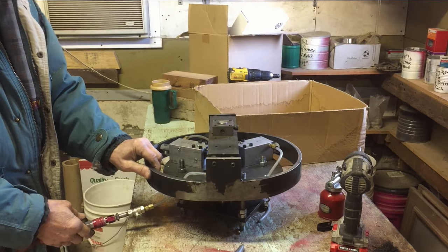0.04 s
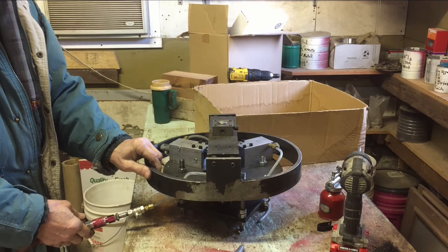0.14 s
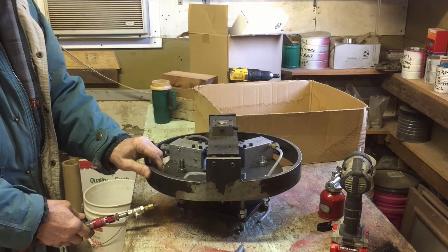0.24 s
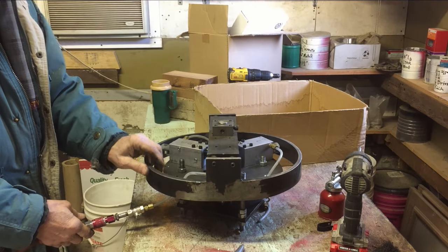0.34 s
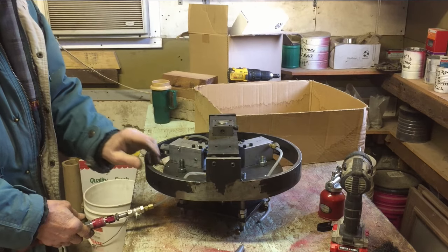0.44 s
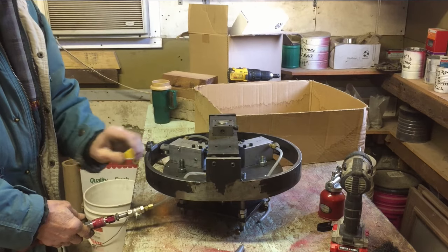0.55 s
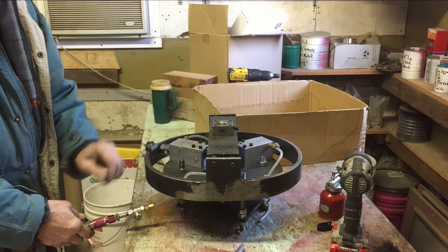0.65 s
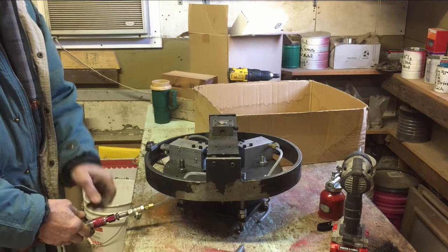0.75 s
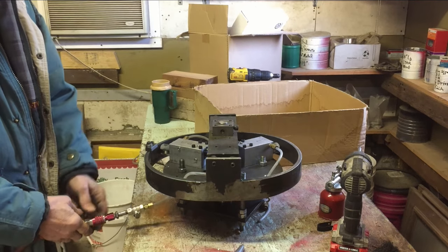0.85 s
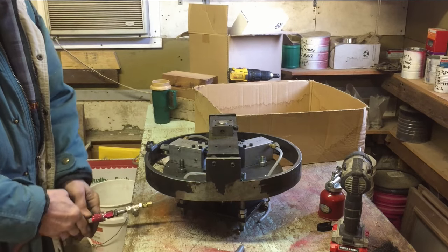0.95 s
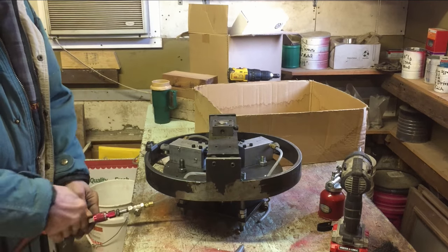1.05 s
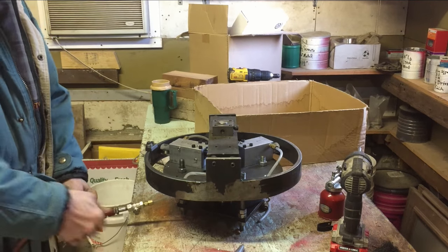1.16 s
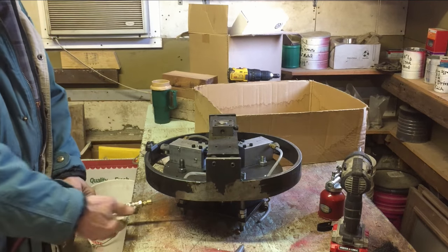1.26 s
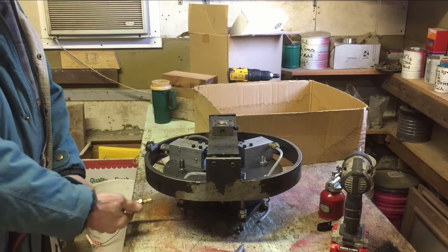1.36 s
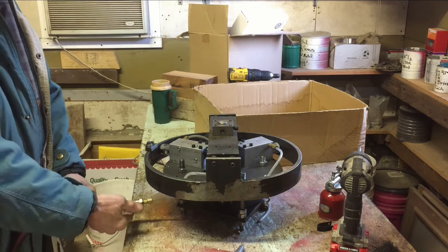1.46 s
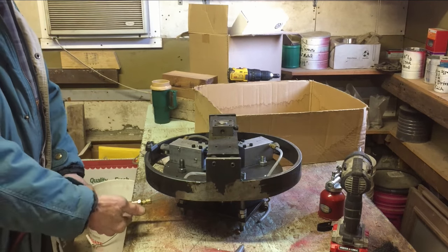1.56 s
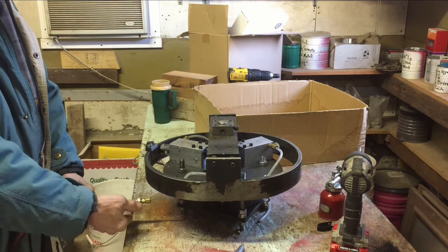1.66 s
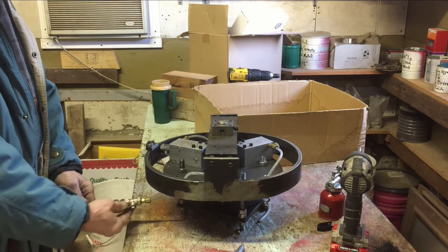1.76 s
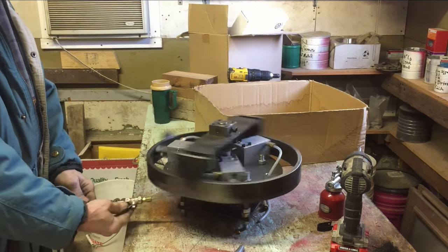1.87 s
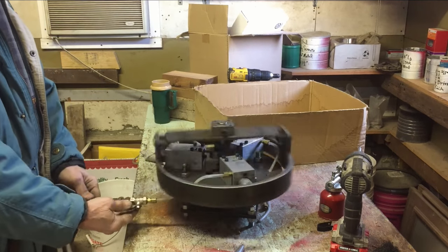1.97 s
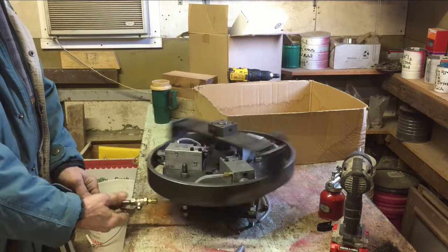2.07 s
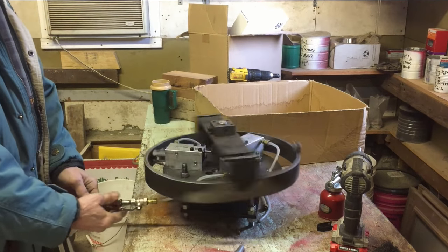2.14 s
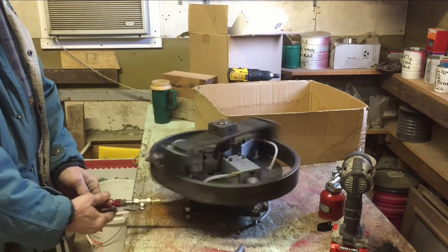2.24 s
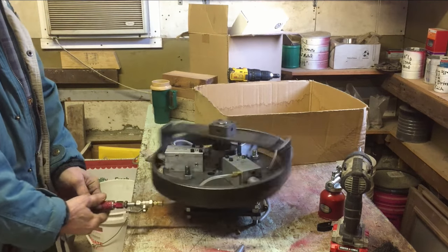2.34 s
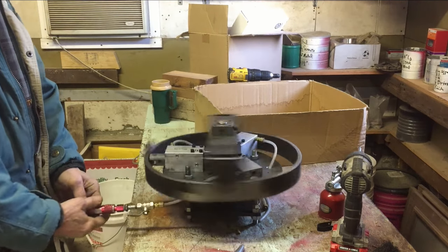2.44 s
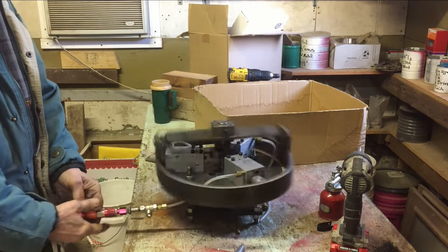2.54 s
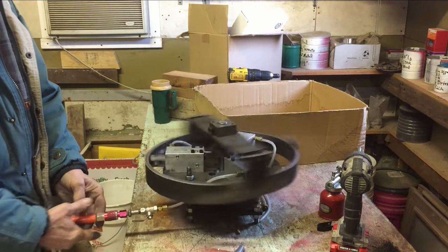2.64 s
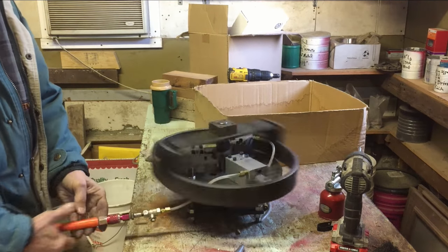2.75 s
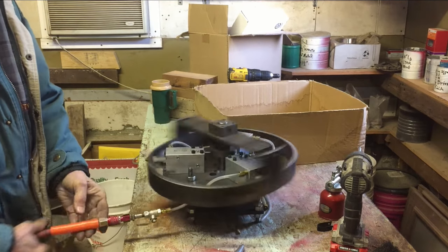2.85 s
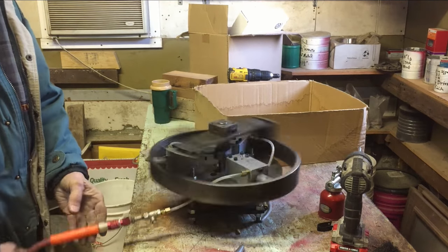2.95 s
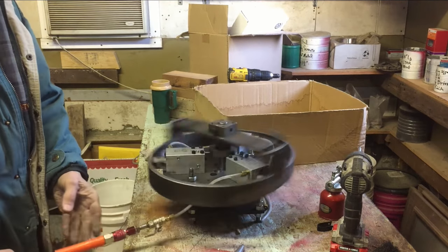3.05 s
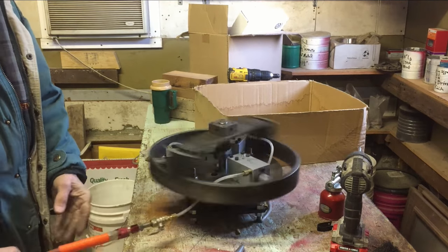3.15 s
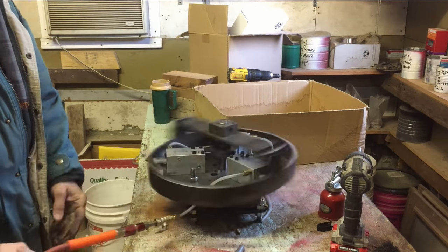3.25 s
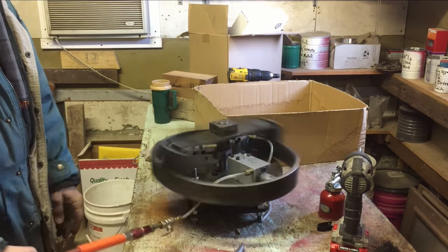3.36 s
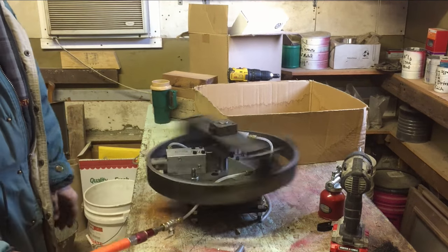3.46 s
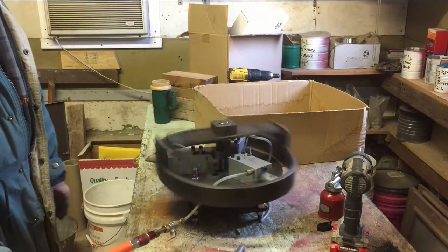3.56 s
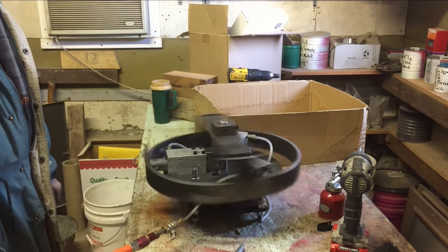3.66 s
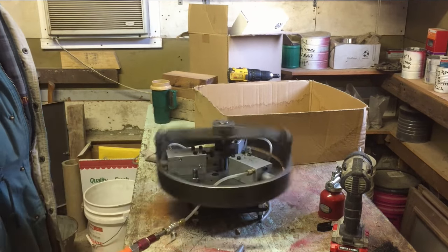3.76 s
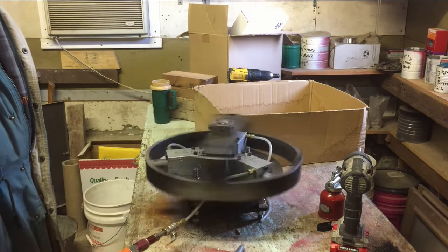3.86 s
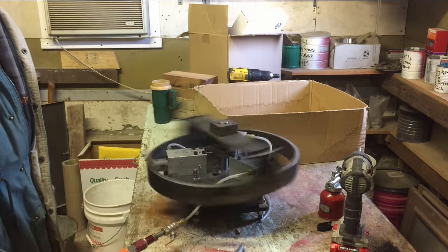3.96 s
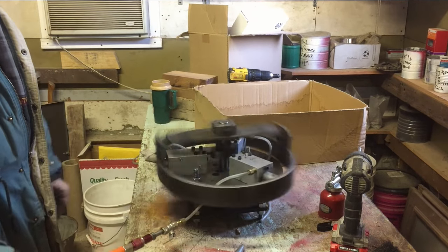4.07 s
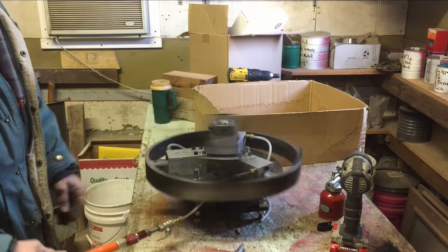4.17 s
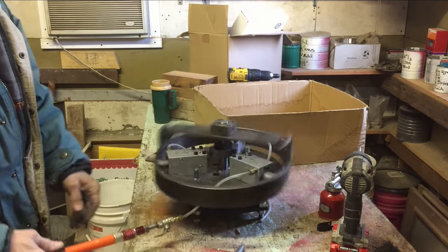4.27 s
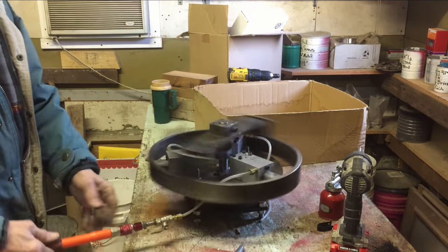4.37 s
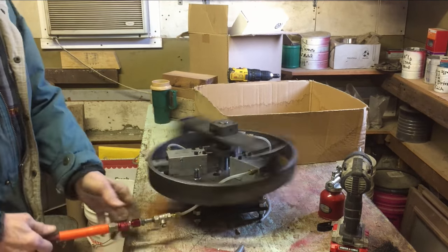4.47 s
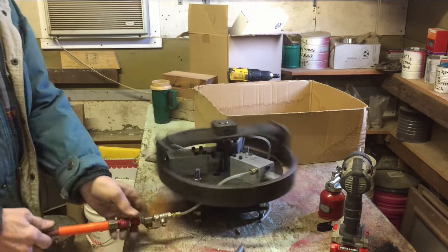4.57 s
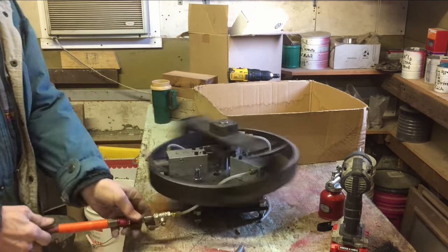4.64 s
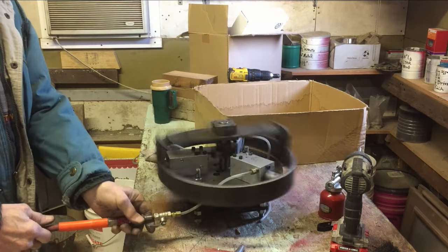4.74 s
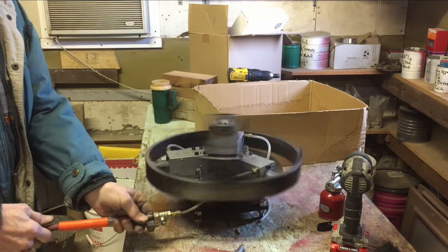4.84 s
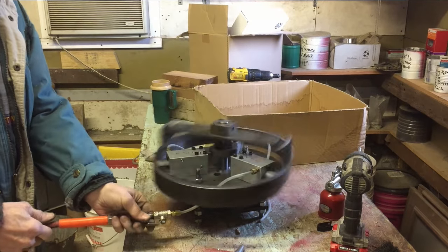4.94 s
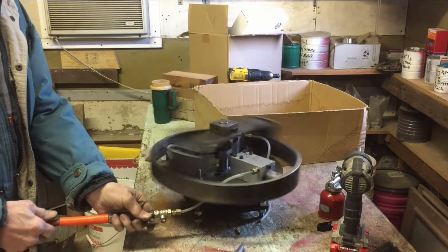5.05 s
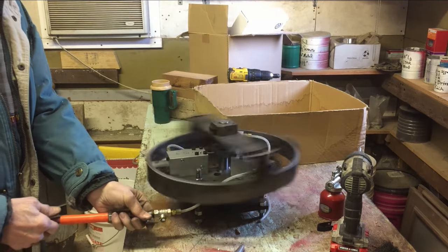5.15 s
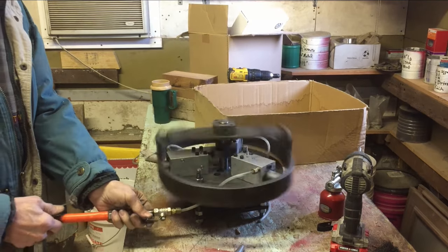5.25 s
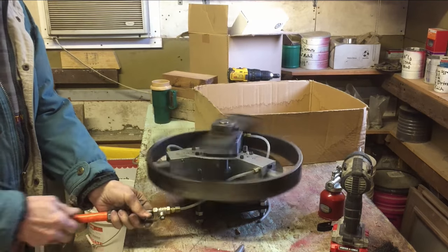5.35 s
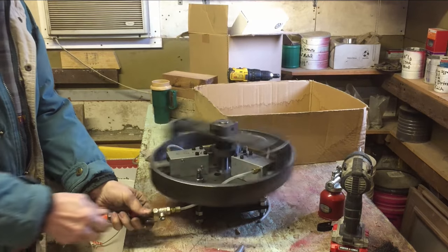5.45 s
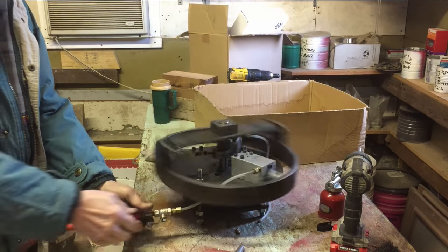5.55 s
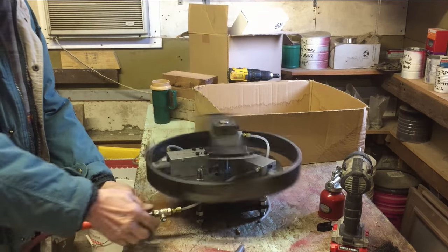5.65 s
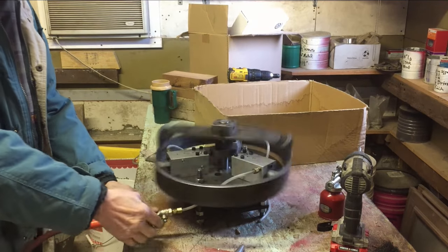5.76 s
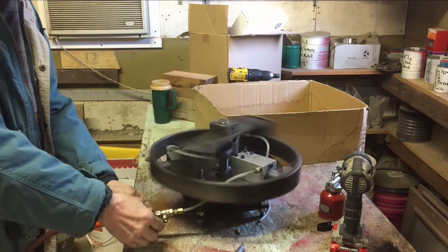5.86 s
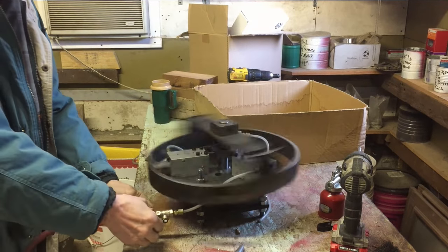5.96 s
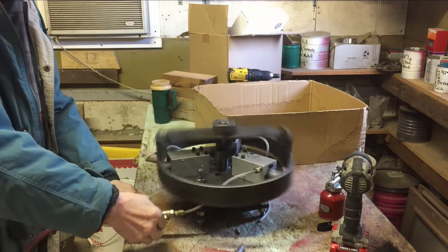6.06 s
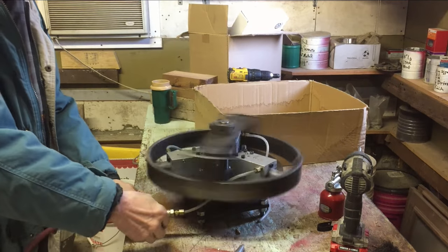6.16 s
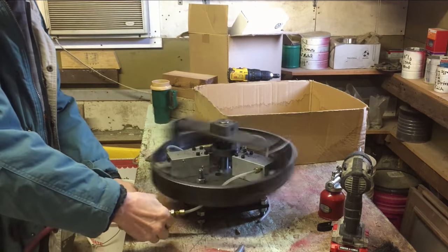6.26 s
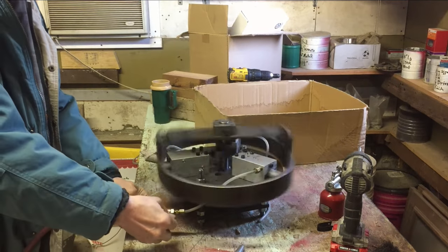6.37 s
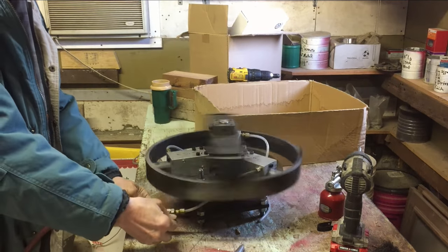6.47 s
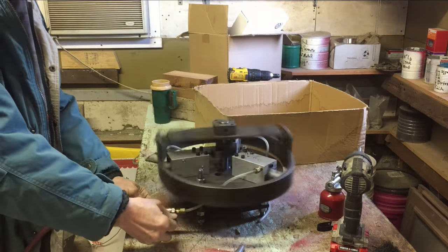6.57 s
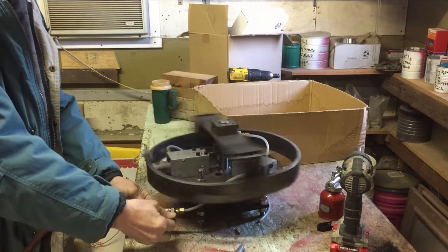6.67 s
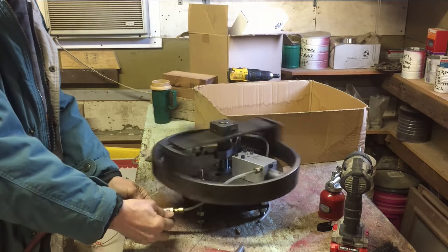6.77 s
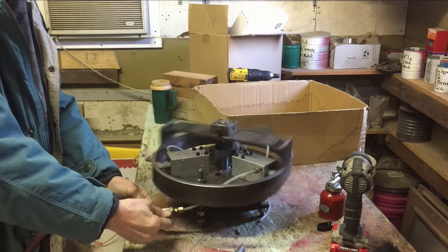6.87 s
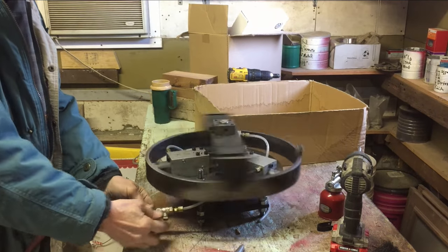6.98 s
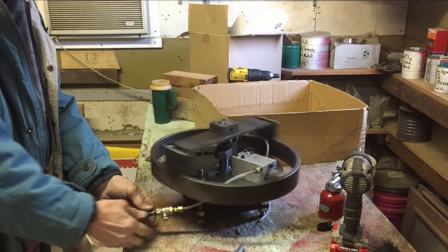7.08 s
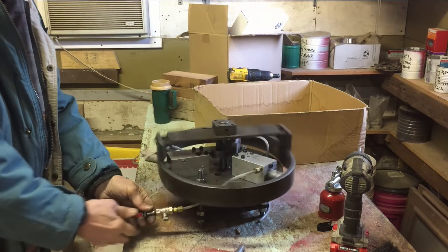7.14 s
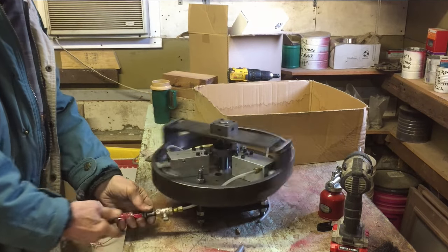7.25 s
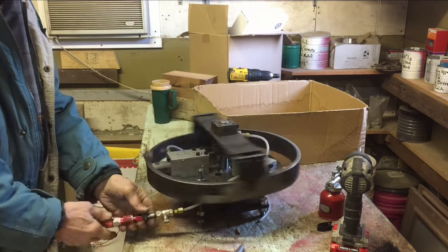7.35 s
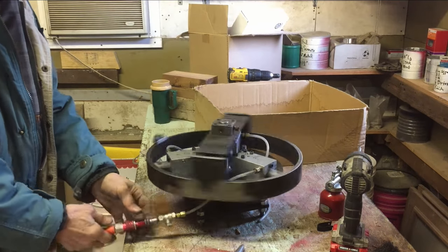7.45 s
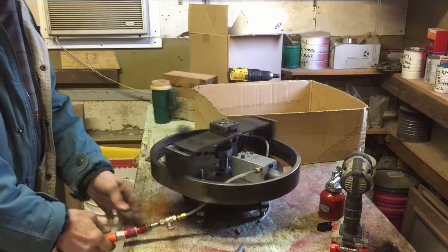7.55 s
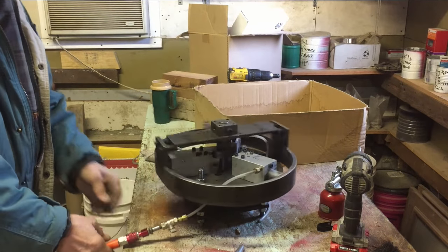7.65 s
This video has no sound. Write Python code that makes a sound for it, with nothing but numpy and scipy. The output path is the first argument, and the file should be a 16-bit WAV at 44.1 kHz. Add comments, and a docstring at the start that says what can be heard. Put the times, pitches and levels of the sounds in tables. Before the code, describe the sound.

Compressed air bursts into a rotary engine, quickening to rapid harsh chuffs over metallic roller rattle, until the air shuts off and it clatters slower.

```python
"""A homemade rotary air engine runs on a garage workbench, a metre or two from a phone's microphone.
Each stroke hisses as valve-gated noise; rollers and cam knocks on the steel ring drive resonances of the parts.
Before the tap opens a far-off truck drones as two partials, fingers tick on the tap and cloth scuffs.
With the air shut off the rotor coasts down and the pistons only spit, short ticks and sighs of bright noise."""
import sys
import numpy as np
from scipy import signal
from scipy.fft import rfft, irfft
from scipy.io import wavfile
from scipy.ndimage import uniform_filter1d

SR = 44100
rng = np.random.default_rng(int(sys.argv[2]) if len(sys.argv) > 2 else 0)


def store_wav(level_fs):
    """Save 16-bit WAV to argv[1]."""
    pcm = np.round(np.clip(np.atleast_2d(level_fs), -1, 1) * 32767)
    wavfile.write(sys.argv[1], SR, pcm.T.astype(np.int16))


N = 340042


def undb(db):
    """Turn dB into gain."""
    return 10 ** (np.asarray(db) / 20)


def level(x, db):
    """Set the rms of a signal in dB."""
    return x * undb(db) / np.sqrt(np.mean(x ** 2))


def curve(table):
    """Read the columns of a table along time, straight lines between its rows."""
    seconds, *columns = np.transpose(table)
    return [np.interp(np.arange(N) / SR, seconds, column) for column in columns]


def colour(x, points):
    """Shape the spectrum of a noise through (frequency [Hz], gain [dB]) points, on a log frequency axis."""
    hz, db = np.transpose(points)
    bins_hz = np.maximum(np.arange(N // 2 + 1) * SR / N, 1)
    gain_db = np.interp(np.log(bins_hz), np.log(hz), db)
    return irfft(rfft(x) * undb(gain_db), N)


def ring(x, modes, sway_db=0):
    """Sum resonances, neighbours in opposite phase; each swells and sinks on its own."""
    total = 0
    for k, (hz, width_hz, db) in enumerate(modes):
        gain = (-1) ** k * undb(db + sway_db * walk(25))
        total = total + gain * signal.lfilter(*signal.iirpeak(hz, hz / width_hz, SR), x)
    return total


def fade(x, t60_s):
    """Give every spike an exponential tail that falls 60 dB in t60_s."""
    return signal.lfilter([1], [1, -np.exp(-np.log(1000) / (t60_s * SR))], x)


def walk(rate_hz):
    """Random levels, each held 1 / rate_hz s, then smoothed twice over that time."""
    hold = int(SR / rate_hz)
    steps = np.repeat(rng.standard_normal(N // hold + 1), hold)
    return uniform_filter1d(uniform_filter1d(steps, hold), hold)[:N]


def grains(rate_hz, scatter_db):
    """Random clicks of uneven size and either sign, rms 1."""
    size = undb(scatter_db * np.clip(rng.standard_normal(N), -2, 2))
    size = size * rng.choice([-1, 1], N)
    return level(size * (rng.random(N) < rate_hz / SR), 0)


def dying(seconds, db, t60_s):
    """An envelope that jumps at each event and dies away."""
    starts = (np.asarray(seconds) * SR).astype(int)
    return fade(np.bincount(starts, undb(db), N)[:N], t60_s)


# a truck far outside: (time [s], firing rate [Hz], first partial [dB], second partial [dB])
TRUCK_PASS = [(0, 56, -67, -70), (.132, 57, -56, -56), (.5, 57.8, -54, -55.5), (.7, 60, -51, -58),
              (.75, 62, -53, -74), (.8, 63, -52, -64), (.89, 65.5, -62, -65), (.93, 66, -57, -76),
              (1.2, 68.6, -53.5, -69), (1.416, 71, -63, -81), (1.5, 73.2, -52, -80),
              (1.545, 73.5, -66, -84), (1.6, 74.5, -55, -80), (1.68, 75, -68, -82), (1.85, 75.2, -66, -80)]


def truck():
    """Two sine partials follow the firing rate, wavering in pitch and level; the last row is held."""
    firing_hz, first_db, second_db = curve(TRUCK_PASS)
    phase = 2 * np.pi * np.cumsum(firing_hz * (1 + 0.0089 * walk(13.8))) / SR
    first = undb(first_db + 1.5 * walk(14)) * np.sin(phase)
    second = undb(second_db + 3.4 * walk(19.9)) * np.sin(2 * phase)
    return np.sqrt(2) * (first + second)  # table levels are rms


# spectrum of the quiet garage around the microphone: (frequency [Hz], relative density [dB per Hz])
GARAGE_HUSH = [(15, -41), (25, -18), (49, -20.5), (75, -4), (94, 1), (113, -7), (254, -19), (3290, -30),
               (10500, -36.5), (13000, -38), (15700, -48)]


def hush():
    """The garage's own hush is coloured noise that drifts slightly in level."""
    return level(colour(rng.standard_normal(N), GARAGE_HUSH), -65.5) * undb(0.5 * walk(4.1))


# spectrum of the ticks, seep and spits: (frequency [Hz], relative density [dB per Hz])
SPIT_SPECTRUM = [(3000, -23), (6000, -1.5), (8500, -3.5), (11000, -5), (15700, -8)]


def bright_noise():
    """Bright noise with a fluttering level, for the tap's ticks and the pistons' spits."""
    return undb(2.9 * walk(70)) * level(colour(rng.standard_normal(N), SPIT_SPECTRUM), 0)


# fingers on the brass tap: (time [s], onset level [dB])
FINGER_TICKS = [(0.4794, -69), (1.1094, -68), (1.1794, -72)]


def fingers():
    """Each finger tick on the brass tap is a short dying burst of bright noise."""
    return dying(*np.transpose(FINGER_TICKS), 0.08) * bright_noise()


# sleeves and hose close by: (time [s], onset level [dB])
CLOTH_SCUFFS = [(.96, -71), (1.05, -68), (1.11, -65), (1.15, -77), (1.228, -68), (1.275, -70), (1.32, -74)]


def cloth():
    """Sleeves and hose scuff: random clicks through three broad resonances, dying after each rub."""
    rub = ring(grains(1500, 2.7), [(750, 400, 2), (1500, 990, 7), (9000, 2500, -14)])
    return level(rub, 0) * dying(*np.transpose(CLOTH_SCUFFS), 0.31)


BLEED_T60_S = 0.17  # trapped air runs out after the valve shuts
OPEN_S, OPEN_SHARE = 0.048, 0.35  # the valve stays open this long plus a share of the stroke
HISS_DB, HISS_SAG_DB_PER_S, PUFF_SCATTER_DB = -16.5, -0.5771, 1.08  # no two strokes hiss alike
# three ports pass while the valve is open: first peak and spacing (share of open time)
PORT_FIRST, PORT_STEP = 0.25, 0.3335
# climb over the open time, swing from port to port, rise time; the rush peaks between the jet's puffs
JET_CLIMB_DB, JET_RIPPLE_DB, JET_RISE_S = 4.5, 2.5, 0.0013
RUSH_CLIMB_DB, RUSH_RIPPLE_DB, RUSH_RISE_S = 5, 5.5, 0.01
CLOSING_S, CLOSING_DB_PER_S = 6.18, -23  # the tap is turned shut
# the valve opens, two strokes to a turn; the tap starts the first, the air is off at the last: (time [s])
VALVE_OPENS_S = [1.796, 2.216, 2.494, 2.727, 2.946, 3.15, 3.344, 3.53, 3.71, 3.885, 4.062, 4.227, 4.399,
                 4.566, 4.735, 4.891, 5.057, 5.22, 5.386, 5.541, 5.704, 5.862, 6.025, 6.18, 6.342]
# the tap drives the first long stroke: (time [s], jet level [dB], rush against the jet [dB])
TAP_STROKE = [(1.797, -61, -12), (1.805, -35, -4), (1.817, -26, 5), (1.833, -15, -15), (2.019, -14, 0),
              (2.033, -16.5, 2), (2.051, -8, -14), (2.149, -53, -2), (2.21, -35, -3)]
# spectrum of the valve's jet: (frequency [Hz], relative density [dB per Hz])
JET_SPECTRUM = [(880, -17), (1500, -10.5), (1920, -11.5), (2290, -14.5), (3490, -8.5), (3810, -14),
                (4880, -16), (5940, -6), (7660, -6.5), (8710, -2), (10600, -2), (11100, -2.5), (15700, -1)]


def air():
    """Air through the valve makes a bright jet noise, with a duller rush from the cylinders."""
    t = np.arange(N) / SR
    tap_db, tap_rush_db = curve(TAP_STROKE)
    tap_db -= 60 * np.maximum(t - VALVE_OPENS_S[1], 0) / BLEED_T60_S
    first_stroke = (t > TAP_STROKE[0][0]) * (t < VALVE_OPENS_S[2])
    jet_flow = first_stroke * undb(tap_db)
    rush_flow = first_stroke * undb(tap_db + tap_rush_db)
    for s, next_s in zip(VALVE_OPENS_S[1:], VALVE_OPENS_S[2:]):
        age = np.maximum(t - s, 0)
        open_s = OPEN_S + OPEN_SHARE * (next_s - s)
        share = np.minimum(age / open_s, 1)
        ports = np.cos(2 * np.pi * (share - PORT_FIRST) / PORT_STEP)
        db = HISS_DB + HISS_SAG_DB_PER_S * s
        db = db - 60 * np.maximum(age - open_s, 0) / BLEED_T60_S
        db += CLOSING_DB_PER_S * np.maximum(t - CLOSING_S, 0)
        db += PUFF_SCATTER_DB * rng.standard_normal() * ports
        jet_db = db + JET_CLIMB_DB * share + JET_RIPPLE_DB * ports
        rush_db = db + RUSH_CLIMB_DB * share - RUSH_RIPPLE_DB * ports
        jet_flow += (1 - np.exp(-age / JET_RISE_S)) * undb(jet_db)
        rush_flow += (1 - np.exp(-age / RUSH_RISE_S)) * undb(rush_db)
    jet = level(colour(rng.standard_normal(N), JET_SPECTRUM), 0) * undb(4.3 * walk(60))
    rush = level(ring(rng.standard_normal(N), [(5850, 6600, 0)]), -9)
    return jet_flow * jet + rush_flow * rush


COAST_TAU_S = 2.5  # the speed dies away with the air off


def strokes_done():
    """Strokes since the tap opened; after the last the rotor coasts with exponentially dying speed."""
    t = np.arange(N) / SR
    coast_s = COAST_TAU_S * (1 - np.exp(-np.maximum(t - VALVE_OPENS_S[-1], 0) / COAST_TAU_S))
    driven = np.interp(t, VALVE_OPENS_S, np.arange(len(VALVE_OPENS_S)))
    return driven + coast_s / (VALVE_OPENS_S[-1] - VALVE_OPENS_S[-2])


KNOCK_T60_S, CAM_PLAY_S = 0.048, 0.003
CAM_SCATTER_DB, CAM_COAST_DB = 2.5, -5  # uneven from knock to knock; softer with the air off
# the cam meets the rollers three times a stroke, levels against the rolling:
# (place in the turn [strokes, 0-2], bench [dB], frame [dB], ring [dB])
CAM_LOBES = [(.07, -1, 12, 0), (.36, -4, 1, 9.5), (.62, -3, 3, 9.5), (1.07, 2, 14.5, 10),
             (1.36, -10, 13.5, 6.5), (1.65, -0.5, -1.5, 2.5)]
# single extra knocks of the rotor, some heavy, against the rolling:
# (time [s], bench [dB], frame [dB], ring [dB])
EXTRA_KNOCKS = [(2.239, 8, 18.5, 21), (2.812, 0, 6, 6), (3.165, -10, 15, 9), (3.369, 5, -6, 0),
                (3.551, 11.5, -3, -2), (3.601, -5, 14.5, 7), (4.293, 2, 11, 1), (6.206, 3, -4, 0),
                (6.238, -3, 3, 5), (6.351, -8, 12, 6), (7.11, 5, 14.5, 6)]


def cam(strokes):
    """Cam lobes and extra knocks strike as short dying runs of contacts, for bench, frame and ring."""
    turns = int(strokes[-1] / 2)
    place, *part_db = np.tile(np.transpose(CAM_LOBES), turns)
    place = place + np.repeat(2 * np.arange(turns), len(CAM_LOBES))
    luck = rng.standard_normal((4, len(place)))  # timing, then one row for each part
    when = np.interp(place, strokes, np.arange(N) / SR) + CAM_PLAY_S * luck[0]
    part_db = part_db + CAM_SCATTER_DB * luck[1:] + CAM_COAST_DB * (when > VALVE_OPENS_S[-1])
    extra_s, *extra_db = np.transpose(EXTRA_KNOCKS)
    knock_s = np.append(when, extra_s)
    return [dying(knock_s, db, KNOCK_T60_S) * rng.standard_normal(N)
            for db in np.hstack([part_db, extra_db])]


# the load swells once a stroke: place of the peak (share of stroke); it hardly swells with the air off
LOAD_PEAK, COAST_LOAD_SHARE = 0.37, 0.3
DEEP_COAST_DB_PER_S = -5.5  # the bench's deepest modes calm first as the rotor slows
# rollers on the ring, relative levels:
# (time [s], rolling level [dB], bench against it [dB], ring against it [dB])
ROLLER_LEVELS = [(1.8, -60, -27, -6), (1.9, -42, -16, -6), (1.97, -26, -8, -4), (2.2, -27, -14, -9.5),
                 (2.6, -25, -10, -3.5), (3.85, -22.5, -10.5, -2.5), (6.3, -22.5, -11, 0),
                 (6.6, -24.5, -11.5, 2), (7.1, -26.5, -9.5, -3), (7.45, -30.5, -5.5, -4.5),
                 (7.595, -34.5, 0, -11.5), (7.63, -31.5, -5, -8), (7.71, -33, -6, -7)]
# what rings in the workbench: (frequency [Hz], width [Hz], relative level [dB])
BENCH_MODES = [(65, 22, -9), (105, 40, -8), (172, 20, 0), (256, 30, -5), (345, 25, -12), (625, 45, -7)]
# what rings in the engine's frame: (frequency [Hz], width [Hz], relative level [dB])
FRAME_MODES = [(845, 25, -6), (1022, 50, -4), (1112, 25, -2), (1320, 90, -11), (1488, 30, -2),
               (1585, 50, -3), (1660, 28, 3), (1730, 40, -2), (1820, 60, -3), (1960, 45, -3),
               (2080, 80, -7), (2310, 70, -6)]
# what rings in the steel ring: (frequency [Hz], width [Hz], relative level [dB])
RING_MODES = [(2740, 40, -11), (3003, 28, -2), (3038, 28, -.5), (3195, 60, -3), (3400, 130, -8),
              (3974, 32, -.5), (4015, 30, -3), (4128, 32, -4.5), (4310, 70, -9), (4798, 50, -8.5),
              (5150, 65, -8), (5440, 80, -12), (6450, 100, -9), (7650, 80, -21), (8980, 200, -20)]
# spectrum of the unresonant grind: (frequency [Hz], relative density [dB per Hz])
GRIND_SPECTRUM = [(120, -29), (200, -17), (632, -12), (731, -8), (1020, -8.5), (1220, -8.5), (1690, -4.5),
                  (2190, -9), (4070, -7.5), (5970, -22.5), (15700, -60)]


def rotor():
    """Rollers chatter over the track and shake bench, frame and ring; the cam knocks the same parts."""
    t = np.arange(N) / SR
    strokes = strokes_done()
    load = np.cos(2 * np.pi * (strokes - LOAD_PEAK))
    load = load * np.where(strokes > len(VALVE_OPENS_S) - 1, COAST_LOAD_SHARE, 1)
    roll_db, low_db, bright_db = curve(ROLLER_LEVELS)
    turning = undb(roll_db) * (strokes > 0)
    thump, knock, clink = cam(strokes)

    frame_chatter = undb(4 + 2 * load + 2.6 * walk(50)) * grains(1500, 4.5)
    frame = (frame_chatter + knock) * turning
    ring_chatter = undb(6 - 0.8 * load + 2.9 * walk(40)) * grains(900, 4.5)
    rim = (ring_chatter + clink) * undb(bright_db) * turning
    rumble = undb(2 + 2.5 * load + low_db + 3.9 * walk(18)) * rng.standard_normal(N)
    bench = (rumble + thump) * turning
    grind = level(colour(grains(6000, 4.8), GRIND_SPECTRUM), -3.5) * turning * undb(0.4 * bright_db)

    calm = undb(DEEP_COAST_DB_PER_S * np.maximum(t - VALVE_OPENS_S[-1], 0))
    deep = calm * ring(bench, BENCH_MODES[:3], sway_db=1.5)
    upper = ring(bench, BENCH_MODES[3:], sway_db=1.5)
    bench_sound = undb(21) * (deep - upper)  # minus keeps neighbours in opposite phase
    frame_sound = undb(10) * ring(frame, FRAME_MODES, sway_db=4.5)
    ring_sound = undb(11.5) * ring(rim, RING_MODES, sway_db=2.5)
    return frame_sound + ring_sound + bench_sound + grind


SEEP_DB, SEEP_DB_PER_S = -36, -21  # what air is left seeps past the pistons
TICK_T60_S, TICK_RISE_S = 0.053, 0.0016
SIGH_T60_S, SIGH_RISE_S = 0.2, 0.0053
# pistons spit while coasting, levels before the rise: (time [s], tick level [dB], sigh level [dB])
PISTON_SPITS = [(6.343, -21, -31), (6.3844, -36, -35), (6.4852, -36, -35), (6.5144, -38, -44),
                (6.5635, -28, -31), (6.5994, -42, -40), (6.7027, -26, -35), (6.781, -32, -29),
                (6.86, -38, -36), (6.9533, -27, -33), (7.0548, -30, -33), (7.0994, -43, -44),
                (7.1545, -25, -42), (7.3074, -27, -39), (7.433, -34, -40), (7.509, -42, -50),
                (7.6206, -26.5, -42)]


def spits():
    """Each spit is a quick tick with a slower-rising, fluttering sigh, over the dwindling seep of air."""
    t = np.arange(N) / SR
    seep_db = SEEP_DB + SEEP_DB_PER_S * (t - VALVE_OPENS_S[-1]) + 3.8 * walk(80)
    flow = (t > VALVE_OPENS_S[-1]) * undb(seep_db)
    for s, tick_db, sigh_db in PISTON_SPITS:
        age = np.maximum(t - s, 0)
        flow += (1 - np.exp(-age / TICK_RISE_S)) * undb(tick_db - 60 * age / TICK_T60_S)
        flow += (1 - np.exp(-age / SIGH_RISE_S)) * undb(sigh_db - 60 * age / SIGH_T60_S)
    return flow * bright_noise()


ROOM_T60_S, ROOM_DB = 0.29, -14
FACING_HZ = 1  # fixed rate at which the echoes take over from one another


def garage(engine):
    """Three noise-tail echoes take over in turn, as if the rotor faced other walls at a steady rate."""
    t = np.arange(SR // 2) / SR
    wet = 0
    for k in range(3):
        facing = np.cos(2 * np.pi * (FACING_HZ * np.arange(N) / SR + k / 3))
        echo = rng.standard_normal(len(t)) * undb(-60 * t / ROOM_T60_S) * (t > 0.004)
        echo = signal.lfilter([1], [1, -0.4], echo)  # walls and boxes swallow some treble
        echo = echo / np.sqrt(np.sum(echo ** 2))
        wet = wet + signal.fftconvolve(engine * facing, echo)[:N]
    return undb(ROOM_DB) * wet


def scene():
    """Engine and tap ticks with the garage's echo, over the dry background; the same in both channels."""
    background = truck() + hush() + cloth()
    engine = fingers() + air() + rotor() + spits()
    return np.tile(engine + garage(engine) + background, (2, 1))


MIC_LOW_HZ, TOP_HZ, SOFT_CLIP = 44, 15800, 0.78
DIP_HZ, DIP_WIDTH_HZ, DIP_SHARE = 10380, 690, 0.54  # share of the sound removed at the dip


def record(dry):
    """The phone drops deep bass, its sound hole dips the treble, peaks round off; the top is cut."""
    low_cut = signal.butter(2, MIC_LOW_HZ, "high", fs=SR, output="sos")
    dry = signal.sosfilt(low_cut, dry)
    dip = signal.lfilter(*signal.iirpeak(DIP_HZ, DIP_HZ / DIP_WIDTH_HZ, SR), dry)
    heard = dry - DIP_SHARE * dip
    heard = np.tanh(SOFT_CLIP * heard) / SOFT_CLIP
    top_cut = signal.ellip(14, 0.2, 100, TOP_HZ, fs=SR, output="sos")
    return signal.sosfilt(top_cut, heard)


dry = scene()
out = record(dry)
store_wav(out)
```